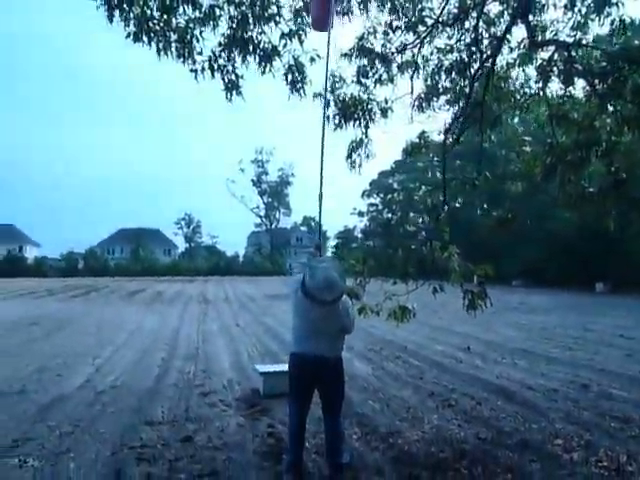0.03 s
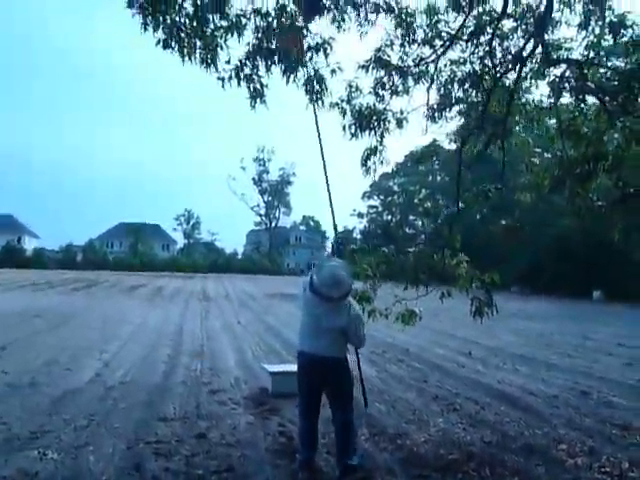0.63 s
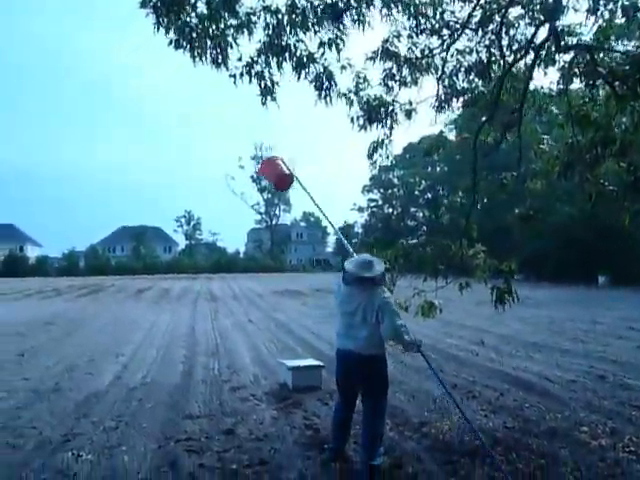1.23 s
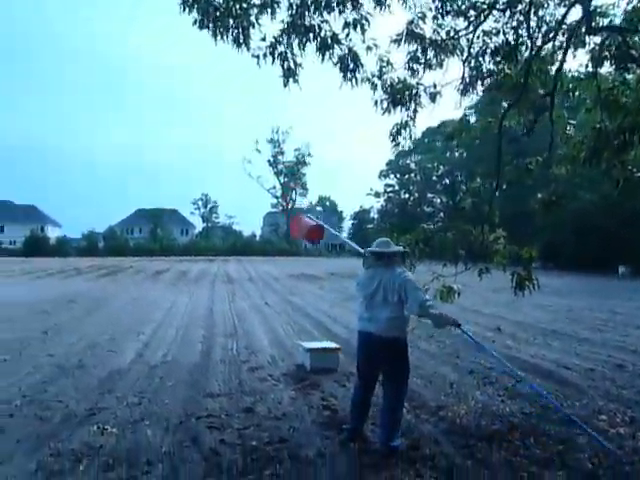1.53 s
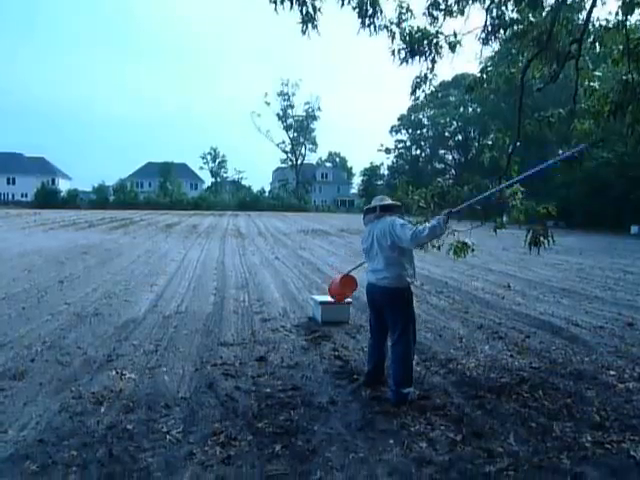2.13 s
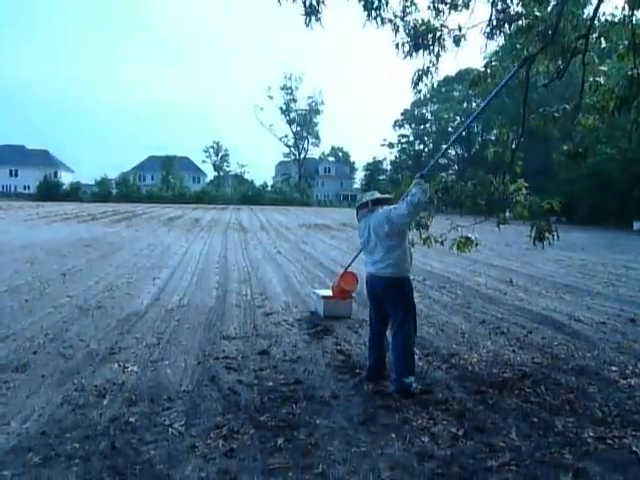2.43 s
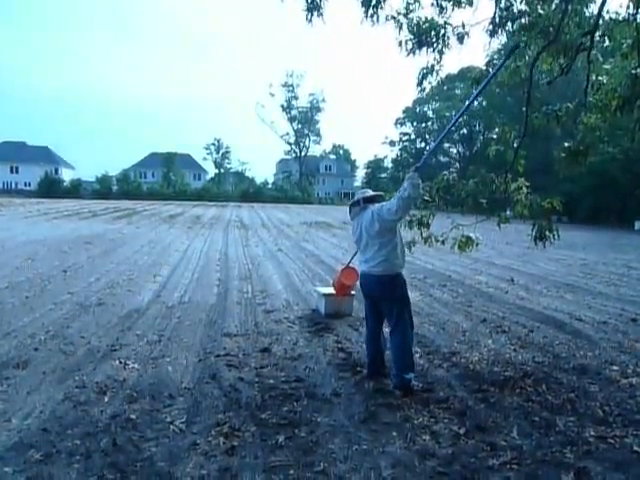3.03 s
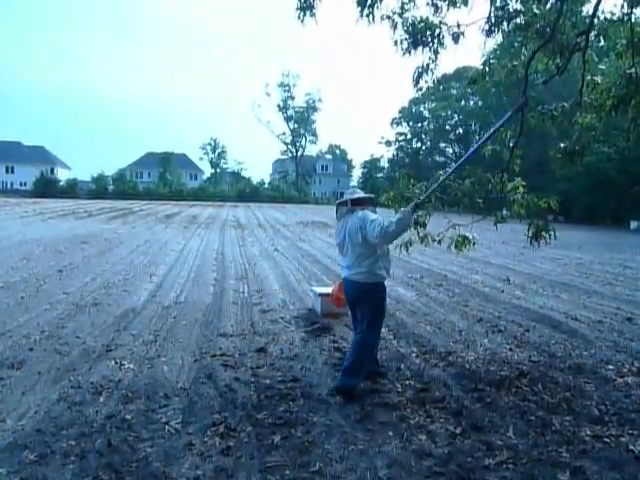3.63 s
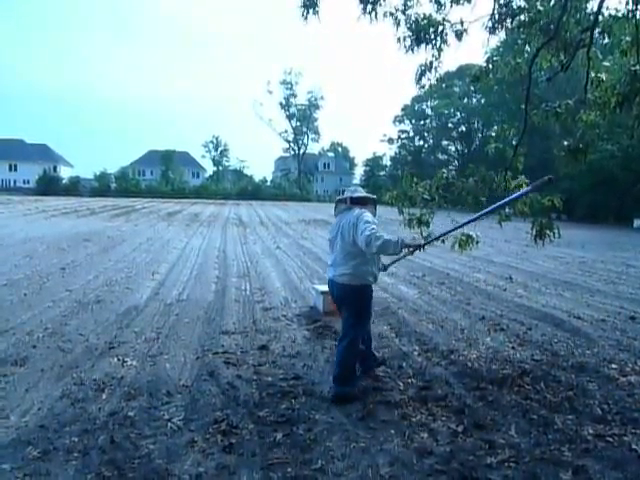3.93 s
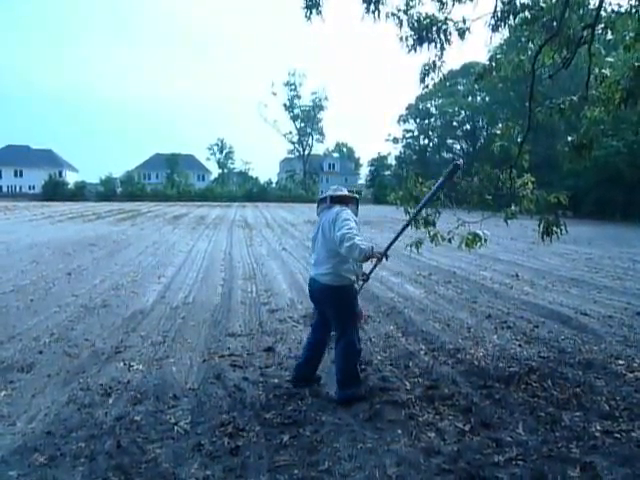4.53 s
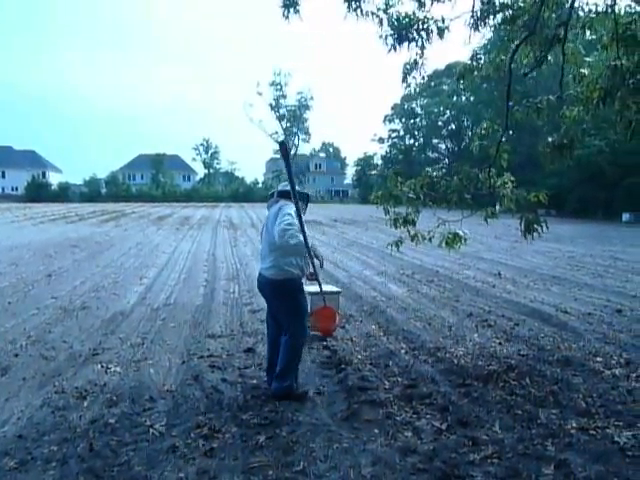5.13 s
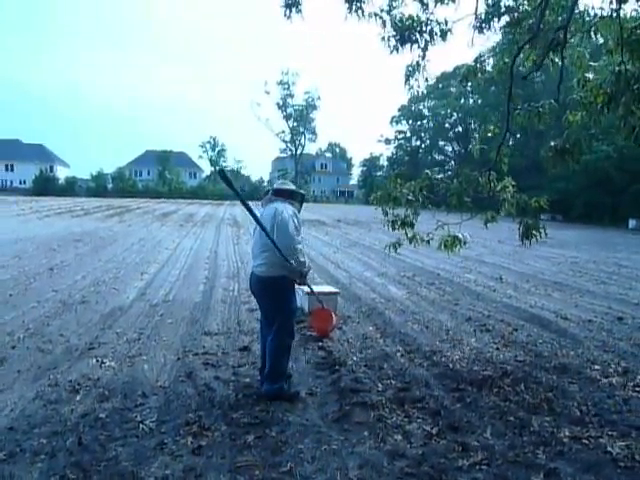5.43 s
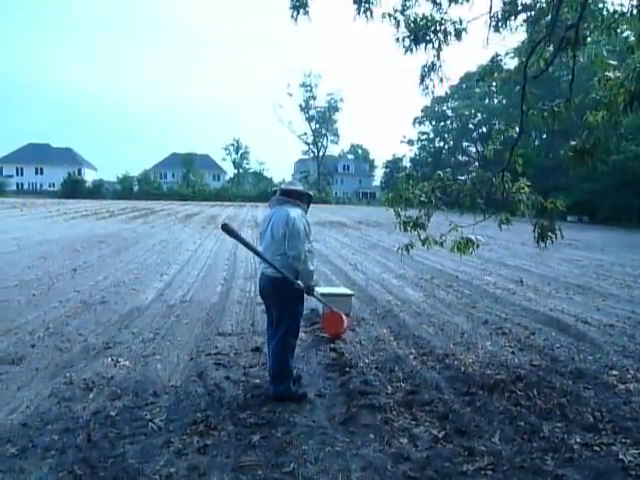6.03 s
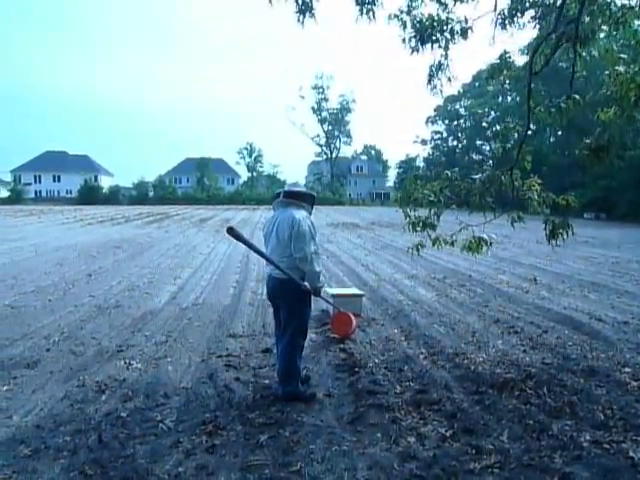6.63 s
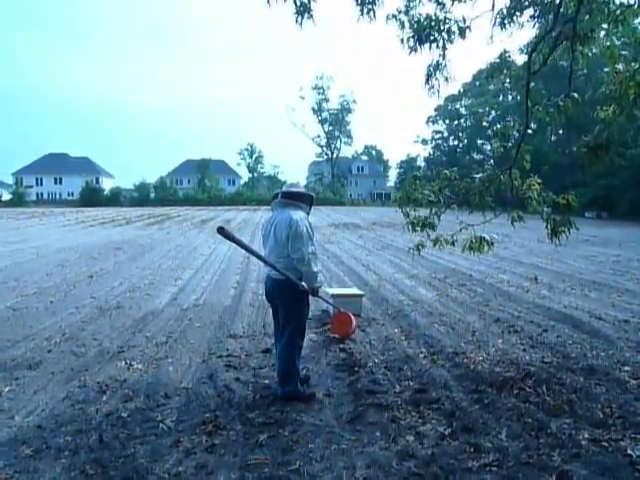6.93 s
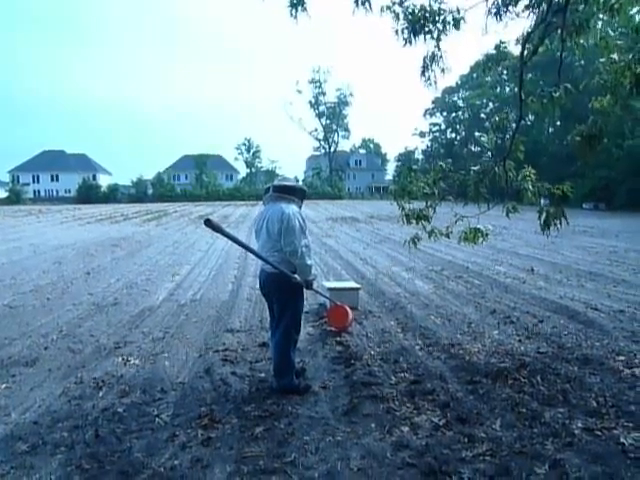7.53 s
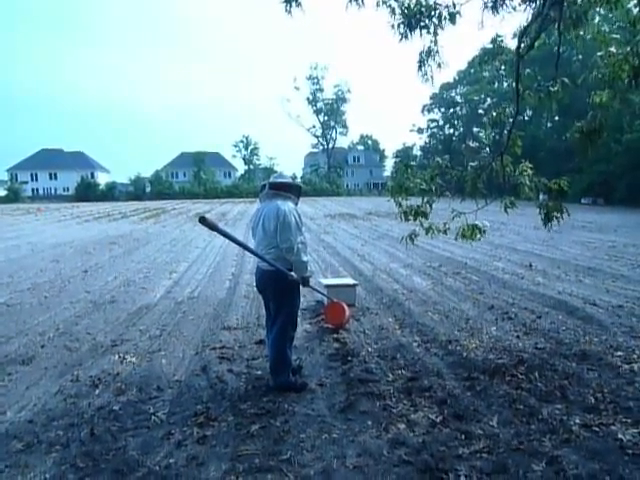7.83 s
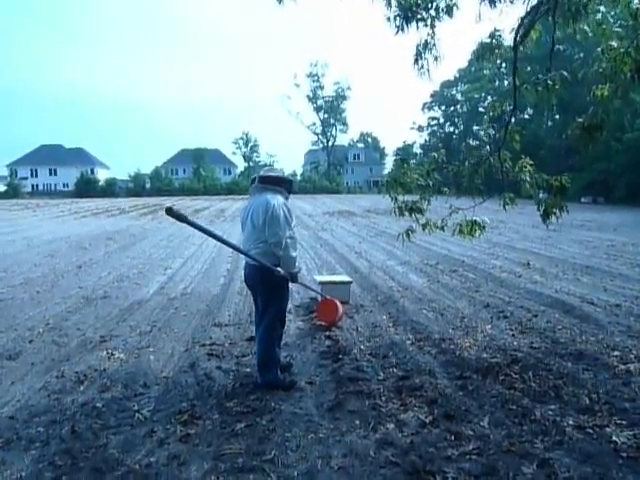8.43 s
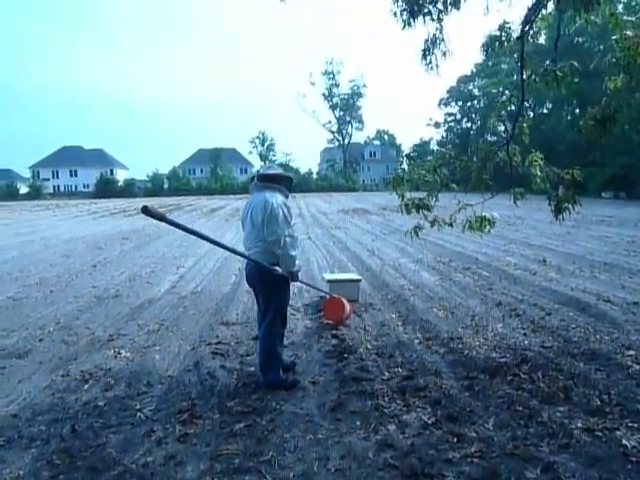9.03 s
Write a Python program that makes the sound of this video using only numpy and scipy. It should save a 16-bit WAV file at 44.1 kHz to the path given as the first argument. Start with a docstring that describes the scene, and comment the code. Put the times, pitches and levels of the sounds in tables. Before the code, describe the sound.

A swarm of bees hums steadily outdoors, with a sharp pole clack, wind bumping the microphone and faint bird chirps.

```python
"""Honeybees swarm around a tree at the edge of a field, dozens of wingbeats merging into one hum.
A bucket on a long pole, on its way down to a hive box, bumps and brushes through leaves as single bees
pass close. The hum rises in pitch as the bees are stirred up. The pole clacks, loudest about halfway,
and the small camera briefly turns its own volume down. After that a far bird chirps more often, and
the breeze that has buffeted the microphone all along freshens towards the end."""
import sys
import numpy as np
from scipy import signal
from scipy.fft import rfft, irfft, next_fast_len
from scipy.io import wavfile

SR = 44100
rng = np.random.default_rng(int(sys.argv[2]) if len(sys.argv) > 2 else 0)


def digitize_waveform(pressure):
    """Quantize a signal to 16-bit integers and store it at the path in sys.argv[1].

    Rows of a 2-D input are taken as channels; values are limited to [-1, 1].
    """
    field = np.atleast_2d(pressure).T
    bounded = np.clip(field, -1, 1)
    quanta = np.round(bounded * 32767).astype(np.int16)
    wavfile.write(sys.argv[1], SR, quanta)


N = 408807
TIME = np.arange(N) / SR


def from_db(db):
    """Turn decibels into a number to multiply by."""
    return 10 ** (np.asarray(db) / 20)


def rms_one(x):
    """Scale a signal so that its average strength (rms) is 1."""
    return x / np.sqrt(np.mean(x ** 2) + 1e-20)


def in_time(rows):
    """Join rows of (time, values...) with straight lines: one curve for each value column."""
    times, *columns = np.transpose(rows)
    return [np.interp(TIME, times, column) for column in columns]


def gain_at(points, hz):
    """Read a spectrum of (frequency, level) points at the given frequencies."""
    point_hz, db = np.transpose(points)
    return from_db(np.interp(np.log(hz + 1e-6), np.log(point_hz), db))


def noise(spectrum):
    """Noise of strength 1, shaped to the given spectrum."""
    size = next_fast_len(N)
    hz = np.arange(size // 2 + 1) * SR / size
    white = rfft(rng.standard_normal(size))
    return rms_one(irfft(white * gain_at(spectrum, hz), size)[:N])


def drift(rate_hz, size=4096):
    """A smooth random wander of strength 1, in `size` even steps through the scene."""
    r = np.exp(-2 * np.pi * rate_hz * N / SR / size)
    return rms_one(signal.lfilter([1], [1, -2 * r, r * r], rng.standard_normal(2 * size))[size:])


def stretch(steps):
    """Spread a short row of steps smoothly over the whole scene."""
    return np.interp(TIME, np.linspace(0, N / SR, len(steps)), steps)


def swell(t, half_length):
    """A bell-shaped rise and fall around time t."""
    return np.exp(-np.minimum(((TIME - t) / half_length) ** 2, 50))


def clicks_at(times, db):
    """One click for each contact."""
    return np.bincount(np.round(times * SR).astype(int), from_db(db), N)


def ring(clicks, hz, ring_s):
    """Each click starts a pure tone that fades by 60 dB in ring_s seconds."""
    r = np.exp(-np.log(1000) / (ring_s * SR))
    angle = 2 * np.pi * hz / SR
    return signal.lfilter([0, np.sin(angle)], [1, -2 * r * np.cos(angle), r * r], clicks + 1e-18)


def air(level_db=-44):
    """The steady, soft rush of open air over the field."""
    # the air's spectrum: f/Hz, relative level/dB
    spectrum = [(25, -10), (50, -4), (90, -3.5), (150, -3.5), (330, -7.5), (700, -7.5), (1100, -9),
                (2000, -17.5), (2550, -20), (3000, -15.5), (3700, -29), (4600, -39.5), (8000, -51)]
    return from_db(level_db) * noise(spectrum)


def wind(lumps_db=3.0, push_cycles=0.54, wake_s=0.042, wake_db=-14.5):
    """Breeze rumbles on the microphone; each swirl pushes it once or twice amid a wake of rough air."""
    # the strength of the breeze: t/s, level/dB
    breeze = [(0, -52), (3.1, -49), (4.7, -64), (5.5, -51), (5.9, -43), (6.9, -55), (7.35, -45),
              (8.05, -33.8), (8.75, -37), (9.27, -34.5)]
    # swirls of air hitting the microphone: t/s, peak level/dB, f/Hz
    swirls = [(.356, -22.5, 114), (.55, -30.5, 91), (1.314, -29, 70), (1.714, -30.5, 90), (2.06, -30, 80),
              (2.43, -21.5, 124.8), (2.75, -33, 90), (2.965, -32, 80), (3.111, -29.5, 70), (3.39, -28, 110),
              (3.74, -32.5, 100.1), (5.08, -34.5, 90), (5.75, -28, 110), (6.15, -28.5, 99.8),
              (6.72, -34, 90), (7.466, -21, 109.9), (7.64, -31, 89), (7.846, -23, 91), (7.915, -27, 130),
              (7.95, -23, 120), (8.376, -18, 129.4), (9.009, -19, 115), (9.106, -17, 111),
              (9.203, -12.5, 134.7), (9.224, -15, 135.3)]
    # the rumble's spectrum: f/Hz, relative level/dB
    spectrum = [(20, -26.5), (45, -2), (80, 2), (140, -3), (200, -6.5), (300, -16.5), (500, -43),
                (1000, -69)]
    breeze_db, = in_time(breeze)
    power, pushes = from_db(breeze_db) ** 2, np.zeros(N)
    for t, db, hz in swirls:
        power += (from_db(db + wake_db) * swell(t, wake_s)) ** 2
        pushes += from_db(db) * swell(t, push_cycles / hz) * np.cos(2 * np.pi * hz * (TIME - t))
    rumble = rms_one(noise(spectrum) * from_db(lumps_db * stretch(drift(12))))
    return pushes + np.sqrt(power) * rumble


def bird(half_length_s=.046, trill_hz=55, trill_depth=0.093, slide=0.04, echoes=10, echo_s=.04):
    """A far bird's raspy, falling chirps, smeared by echoes among the trees."""
    # the chirps: t/s, middle f/Hz, level/dB
    chirps = [(.798, 3090, -49.5), (3.794, 2950, -54.5), (4.571, 3010, -55), (4.909, 2990, -54.5),
              (5.789, 2940, -51.5), (6.259, 3310, -50), (6.66, 3065, -49.5), (7.13, 3010, -46),
              (7.591, 3030, -50), (8.26, 3010, -52), (8.762, 2880, -52), (9.242, 3080, -51)]
    song = np.zeros(N)
    for t, hz, db in chirps:
        fall = slide * np.tanh((TIME - t) / half_length_s)
        trill = trill_depth * (2 * ((TIME - t) * trill_hz % 1) - 1)
        pitch = hz * (1 - fall - trill)
        song += from_db(db) * swell(t, half_length_s) * np.sin(2 * np.pi * np.cumsum(pitch) / SR)
    delays = (rng.random(echoes) ** 2 * echo_s * SR).astype(int)
    return song.std() * rms_one(sum(np.pad(song, (delay, 0))[:N] for delay in delays))


def leaves(grain_db=3.0, stir_db=-57.5, pole_clear_s=4.2, settle_s=.3):
    """Leaves rustle unevenly until the pole is clear of them, swelling each time it brushes past."""
    # the pole brushing twigs and leaves: t/s, half length/s, level/dB
    brushes = [(0.848, 0.73, -54.5), (1.51, .035, -52), (2.2, .08, -55), (2.8, 0.19, -51.5),
               (3.327, 0.029, -44), (3.393, 0.028, -39)]
    # the rustle's spectrum: f/Hz, relative level/dB
    spectrum = [(300, -11.5), (900, -3), (2000, 0), (3100, 1), (3800, -8), (4500, -29), (6000, -35.5)]
    stir = from_db(stir_db) * np.clip((pole_clear_s - TIME) / settle_s, 0, 1)
    power = stir ** 2 + sum((from_db(db) * swell(t, half)) ** 2 for t, half, db in brushes)
    rustle = rms_one(noise(spectrum) * from_db(grain_db * stretch(drift(90))))
    return np.sqrt(power) * rustle


def bucket(level_db=-3):
    """Soft bumps sound only the bucket's low, hollow tones."""
    # the bumps: t/s, relative level/dB
    bumps = [(.055, -31.5), (.311, -32.5), (1.252, -32), (1.261, -29.5), (3.273, -28.5)]
    # the tones the bucket rings with: f/Hz, relative level/dB, ring time/s
    tones = [(488, 0.5, 0.026), (624, 1, 0.05), (715, -5.5, .05), (1060, -4, 0.033)]
    clicks = clicks_at(*np.transpose(bumps))
    return sum(from_db(db + level_db) * ring(clicks, hz, ring_s) * (-1) ** k
               for k, (hz, db, ring_s) in enumerate(tones))


def pole_knocks(level_db=-6, thud_below_hz=700, band_hz=(160, 4800), crack_db=-10, crack_s=0.00089):
    """Each short, dry knock makes a crack of noise and sets the pole ringing."""
    # the knocks: t/s, relative level/dB, change to the low tones/dB
    knocks = [(0.219, -27.5, -14), (3.337, -19.5, 2.5), (3.406, -14, 2.5), (4.267, -29, -7),
              (4.2709, -1, 1), (4.2733, .5, -12), (4.2746, -2.5, -25), (5.11, -36, 0)]
    # the spectrum of the crack: f/Hz, relative level/dB
    spectrum = [(100, -14), (400, -27), (1000, 20), (2900, -16), (4200, -18), (5200, -16.5), (6500, -19),
                (8000, -37)]
    # the tones the pole rings with: f/Hz, relative level/dB, ring time/s
    tones = [(303, -5.5, 0.02), (448, -6, 0.026), (960, -9, 0.034), (1163, -8.5, 0.011), (1370, -3, 0.01),
             (1845, -5.5, 0.022), (2080, -5.5, 0.018), (2440, -6, 0.01), (2670, -3.5, 0.011),
             (2844, -12, 0.033), (4300, -20, 0.005)]
    times, db, thud_db = np.transpose(knocks)
    crack_fade = signal.lfilter([1], [1, -np.exp(-1 / (crack_s * SR))], clicks_at(times, db + crack_db))
    out = noise(spectrum) * crack_fade
    for k, (hz, tone_db, ring_s) in enumerate(tones):
        strength_db = db + tone_db + thud_db * (hz < thud_below_hz) + rng.standard_normal(len(times))
        out += ring(clicks_at(times, strength_db), hz, ring_s) * (-1) ** (k // 2)
    band = signal.butter(5, band_hz, "band", fs=SR, output="sos")
    return from_db(level_db) * signal.sosfilt(band, out)


def wing_stroke(gains, size=2048):
    """One wingbeat's wave, built from the strengths of its harmonics (multiples of the beat rate)."""
    phases = np.exp(2j * np.pi * rng.random(len(gains)))
    return rms_one(irfft(np.r_[0, gains * phases], size))


def buzz(stroke, pitch):
    """Repeat one wing stroke, `pitch` times a second."""
    position = np.cumsum(pitch) * (len(stroke) / SR)
    return stroke[position.astype(int) % len(stroke)]


def close_bees(treble_slope_db=-22, pitch_drop=0.011, wobble=.008):
    """A near bee stands out of the hum, its pitch sinking a little as it passes."""
    # single bees flying by: t/s, half length/s, wingbeat f/Hz, level/dB
    passes = [(.849, 0.15, 226.3, -49), (1.254, 0.1, 222, -50), (2.1, 0.096, 216, -50),
              (2.577, 0.046, 223.7, -39.5), (2.66, 0.043, 217.7, -40), (2.762, 0.075, 213, -42.5),
              (3.054, 0.13, 227.7, -44.5), (6.302, .45, 268, -50), (7.045, .1, 268.6, -50)]
    out, harmonics = np.zeros(N), np.arange(1, 15)
    for t, half, hz, db in passes:
        stroke = wing_stroke(from_db(treble_slope_db * np.log10(harmonics)))
        pitch = hz * (1 - pitch_drop * np.tanh((TIME - t) / half) + wobble * stretch(drift(10)))
        out += from_db(db) * swell(t, half) * buzz(stroke, pitch)
    return out


def swarm(count=56, spread=.085, lag=.035, wander=.027, wander_hz=1.8, flutter=.009, flutter_hz=14.16,
          distance_db=2.5, hum_boost_db=3.0, rasp_boost_db=0.34, stray_db=-3):
    """Each bee beats its wings at its own rate, swerves, and comes nearer or draws away."""
    # the swarm's typical wingbeat: t/s, f/Hz
    wingbeat = [(0, 235.2), (.6, 229.1), (1.3, 231.1), (1.8, 243.2), (2.9, 246.6), (4, 249.1), (4.7, 255.9),
                (6.3, 259.9), (9.27, 259.3)]
    # how stirred up the bees are: t/s, relative hum level/dB, relative rasp level/dB
    excitement = [(0, -51, -48), (.35, -55, -51.5), (.75, -46, -44.6), (1.45, -48, -45.5),
                  (3.35, -45, -45.5), (4.6, -47, -46.5), (6.35, -46, -45), (7.15, -47.5, -47),
                  (7.9, -49.5, -46.2), (8.75, -47, -45.8), (9.27, -50, -47)]
    # one bee's low hum: multiple of the wingbeat, relative level/dB
    hum_harmonics = [(1, -2.5), (2, 2.5)]
    # the spectrum of its brighter rasp: f/Hz, relative level/dB
    rasp_spectrum = [(600, 0.5), (780, -2.5), (1050, 2.5), (1300, -1), (1550, -1), (1780, -6.5),
                     (2000, -6.5), (2250, -11), (2600, -12.5), (2950, -18), (3350, -13), (3900, -34.5),
                     (4600, -44.5)]
    beat_hz, = in_time(wingbeat)
    hum_db, rasp_db = in_time(excitement)
    hum, rasp, harmonics = np.zeros(N), np.zeros(N), np.arange(1, 21)
    for rank in np.linspace(-1, 1, count):   # from the slowest wings to the fastest
        pace = 1 + spread * rank - lag * rank ** 2   # the slowest lag well below the rest
        pitch = beat_hz * stretch(pace + wander * drift(wander_hz) + flutter * drift(flutter_hz))
        hum_stroke = wing_stroke(from_db(np.array(hum_harmonics)[:, 1]))
        rasp_stroke = wing_stroke(gain_at(rasp_spectrum, harmonics * pace * beat_hz.mean()))
        nearness = stretch(from_db(distance_db * np.clip(drift(0.91), -2, 2)))
        raspiness = from_db(stray_db * abs(rank))   # bees far from the typical beat rasp less
        hum += nearness * buzz(hum_stroke, pitch)
        rasp += nearness * raspiness * buzz(rasp_stroke, pitch)
    return (from_db(hum_db + hum_boost_db) * rms_one(hum)
            + from_db(rasp_db + rasp_boost_db) * rms_one(rasp))


def scene():
    """Everything that reaches the microphone, in one channel."""
    return (swarm() + close_bees() + wind() + pole_knocks() + bucket() + leaves() + bird() + air())[None]


def gain_control(x, threshold_db=-12, release_db_per_s=85, attack_s=0.0024, thump_db=-57, thump_hz=8):
    """A loud peak makes the camera turn down with a faint, deep thump; the volume then comes back."""
    over_db = np.maximum(20 * np.log10(np.abs(x) + 1e-9) - threshold_db, 0)
    recovery_db = release_db_per_s * TIME
    held_db = np.maximum.accumulate(over_db + recovery_db, axis=-1) - recovery_db
    smoothing = np.exp(-1 / (attack_s * SR))
    dip_db = signal.lfilter([1 - smoothing], [1, -smoothing], held_db)
    thump = signal.sosfilt(signal.butter(2, thump_hz, "high", fs=SR, output="sos"), dip_db)
    return x * from_db(-dip_db) + from_db(thump_db) * thump


def record(dry, hiss_db=-60.5, cutoff_hz=8050):
    """The camera turns loud peaks down, adds a faint hiss and whine, and cuts off the high treble."""
    # the whine of the camera's electronics: f/Hz, level/dB
    tones = [(4389, -74.5), (6222, -88)]
    whine = sum(from_db(db) * np.sqrt(2) * np.sin(2 * np.pi * hz * TIME) for hz, db in tones)
    out = gain_control(dry) + whine + from_db(hiss_db) * rng.standard_normal(N)
    return signal.sosfilt(signal.ellip(12, .3, 90, cutoff_hz, fs=SR, output="sos"), out)


dry = scene()
out = record(dry)
digitize_waveform(out)
```